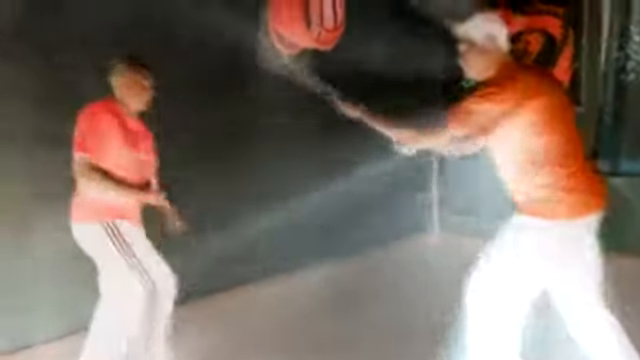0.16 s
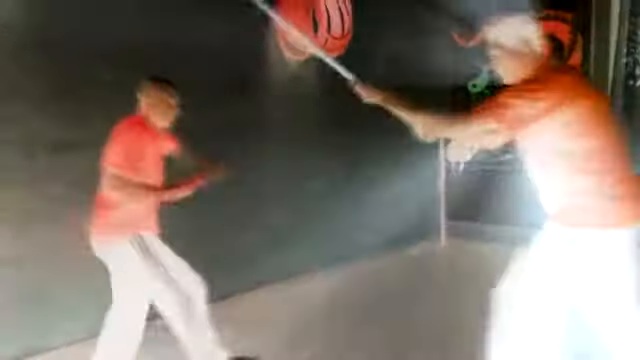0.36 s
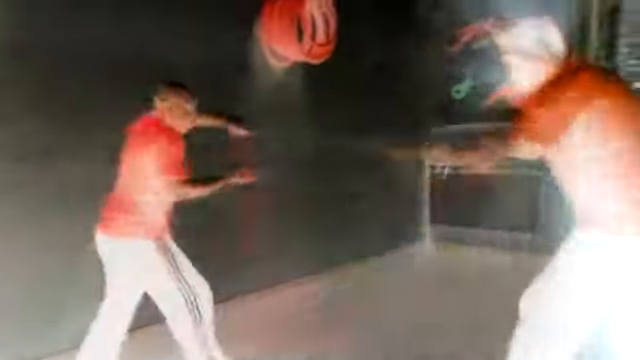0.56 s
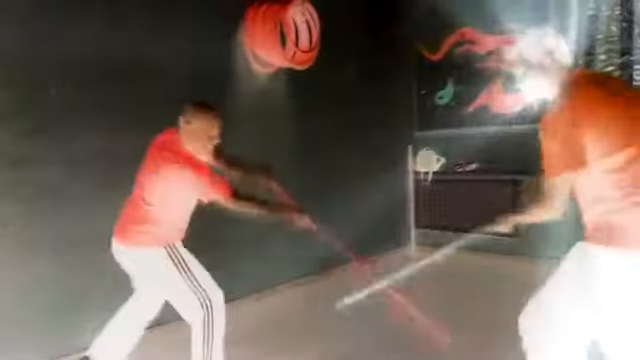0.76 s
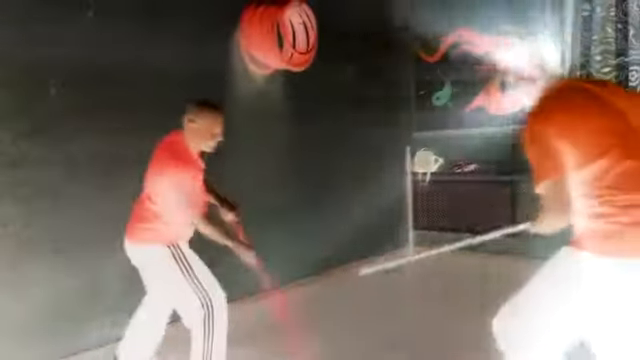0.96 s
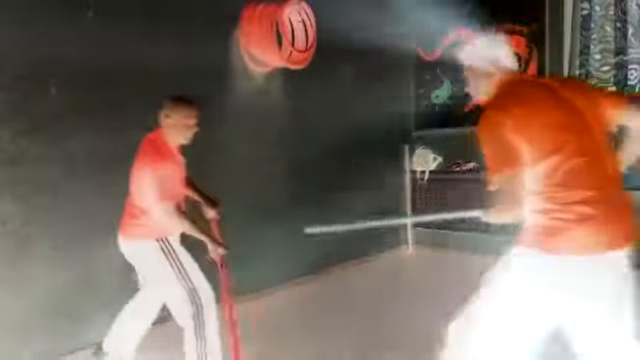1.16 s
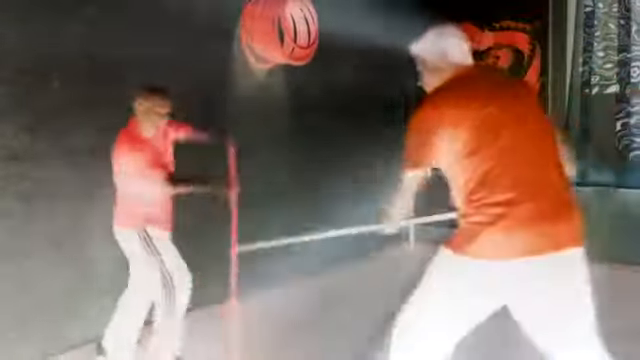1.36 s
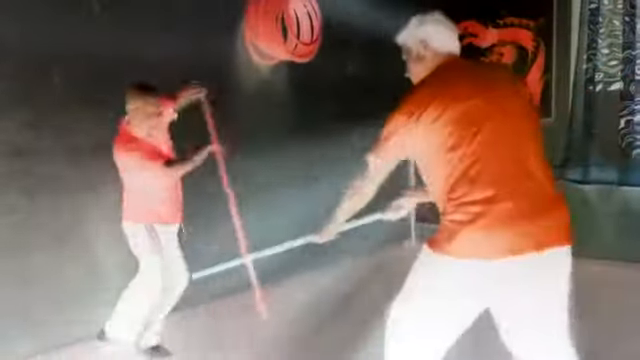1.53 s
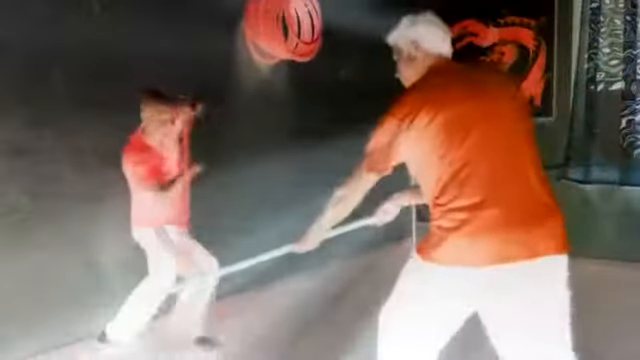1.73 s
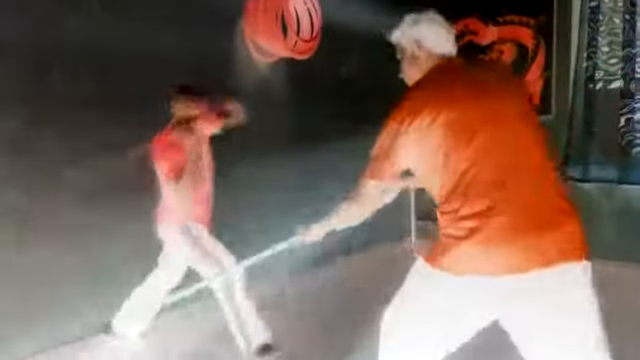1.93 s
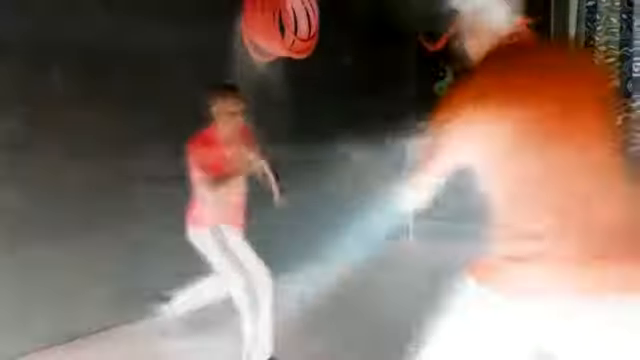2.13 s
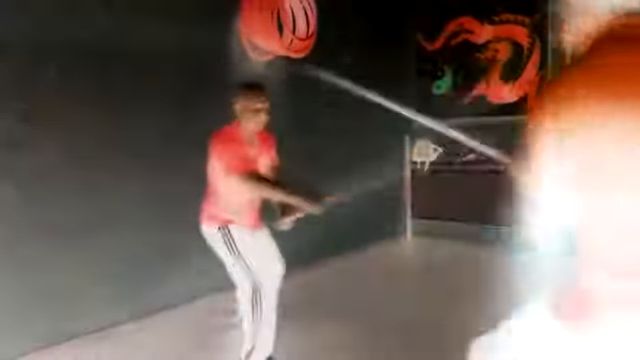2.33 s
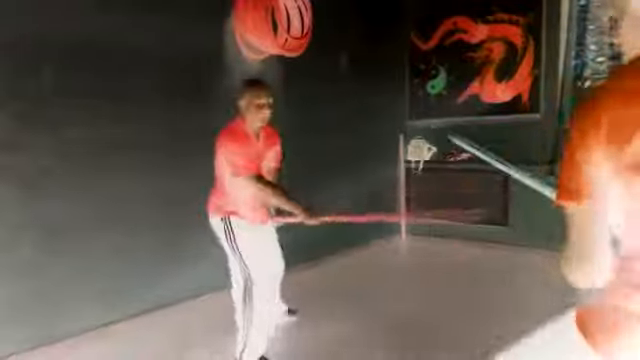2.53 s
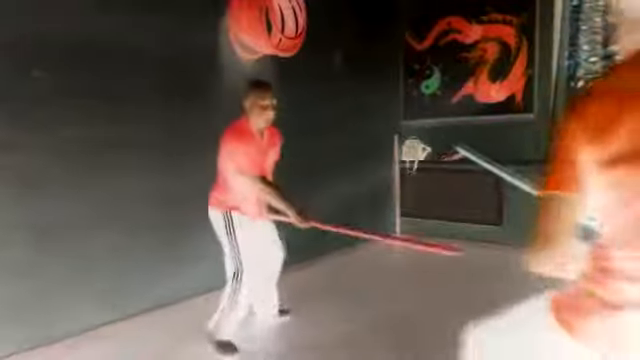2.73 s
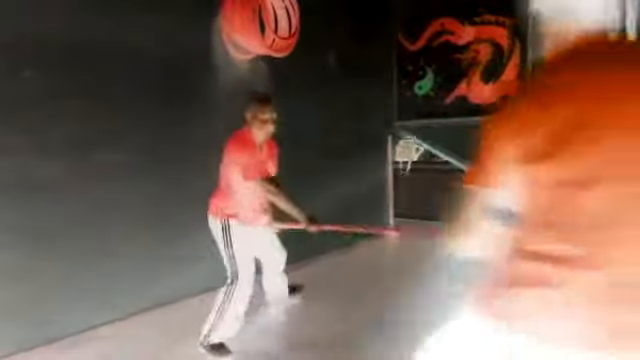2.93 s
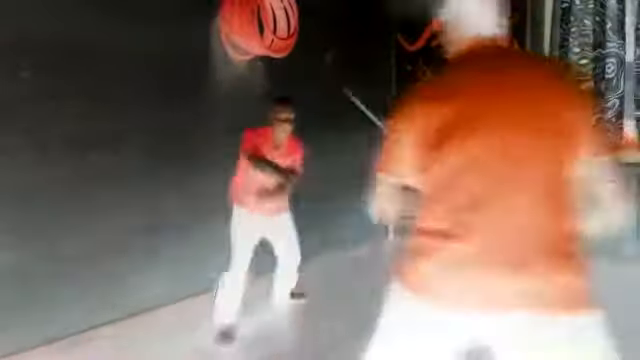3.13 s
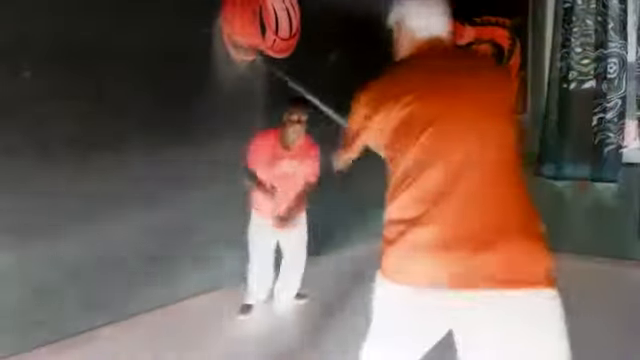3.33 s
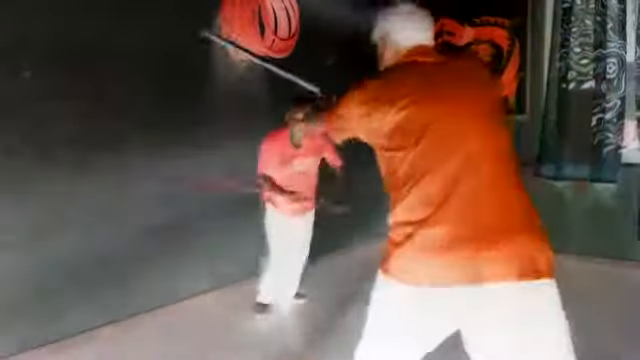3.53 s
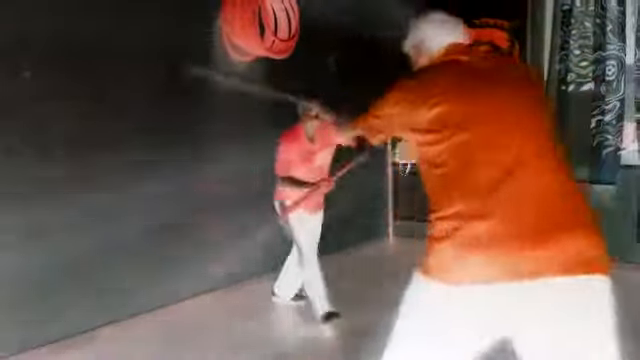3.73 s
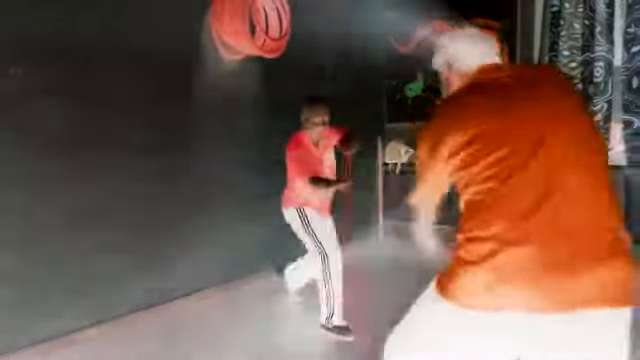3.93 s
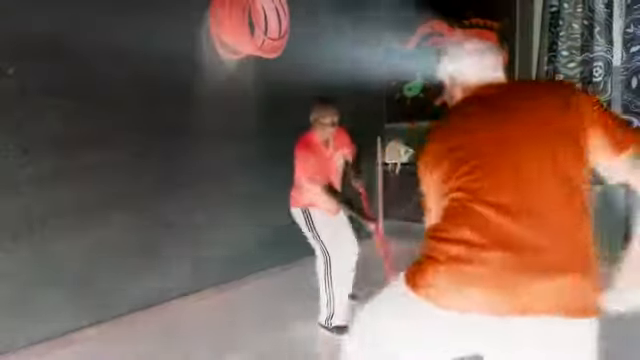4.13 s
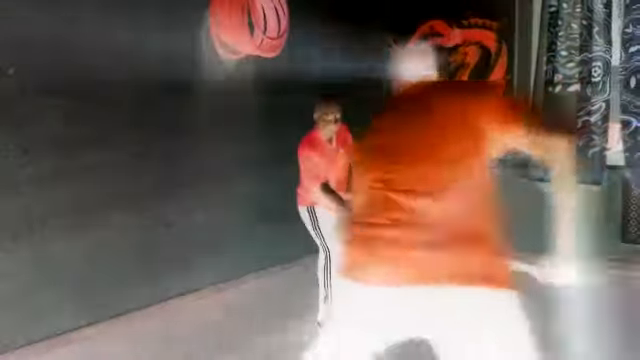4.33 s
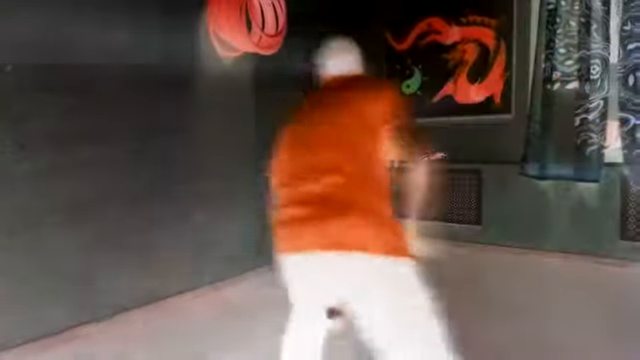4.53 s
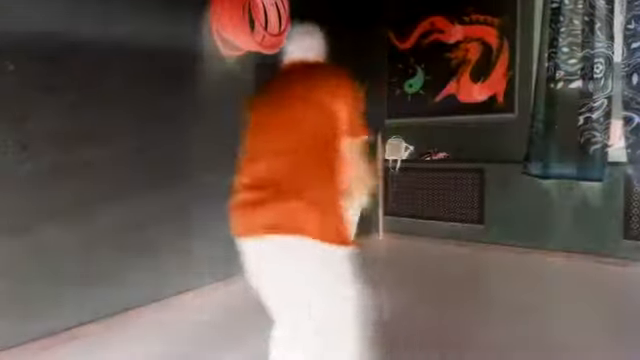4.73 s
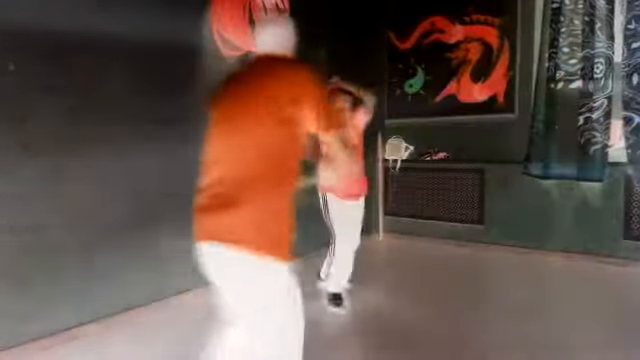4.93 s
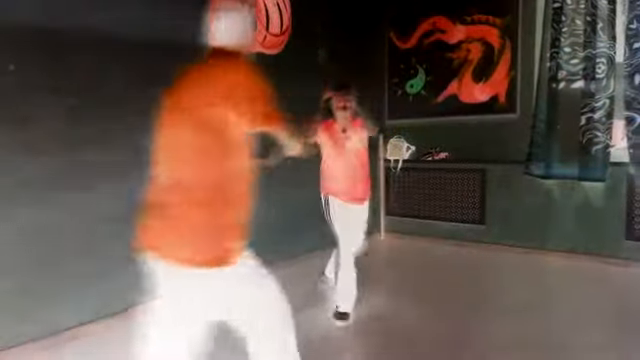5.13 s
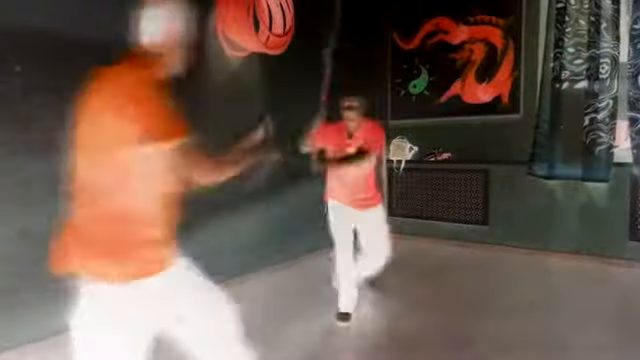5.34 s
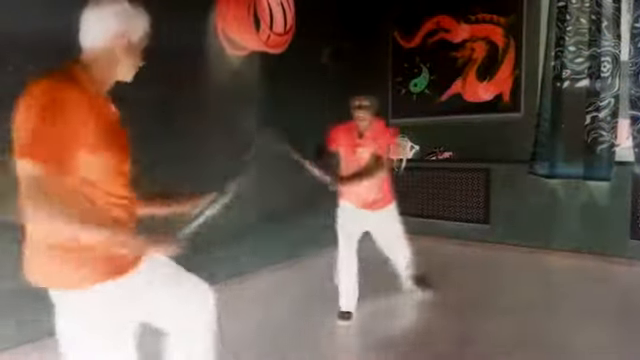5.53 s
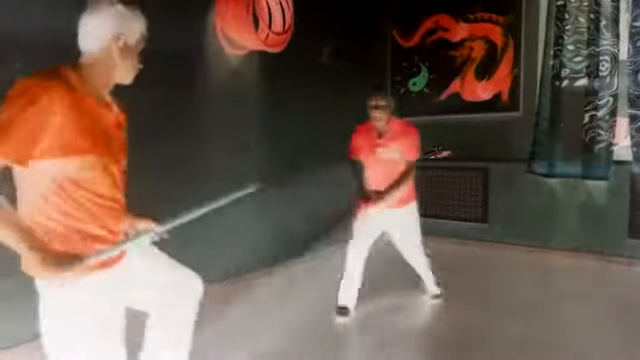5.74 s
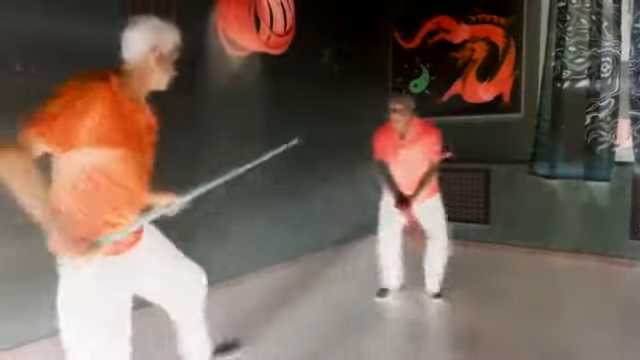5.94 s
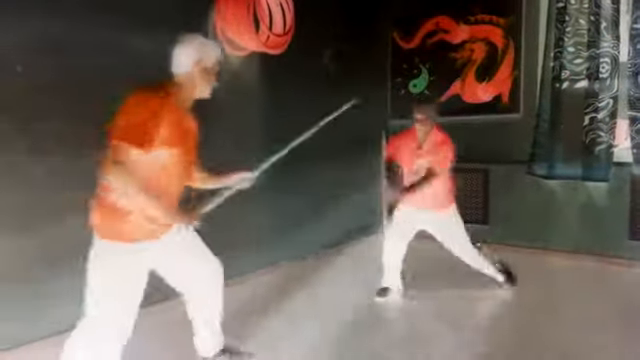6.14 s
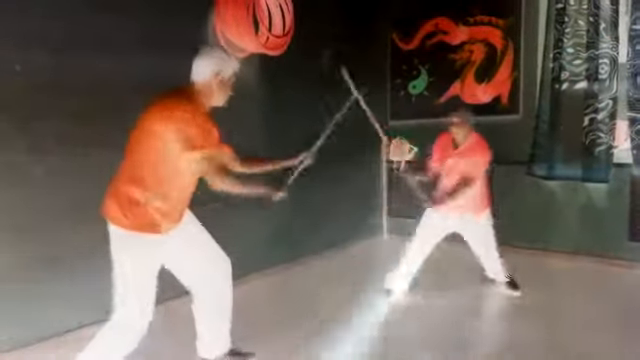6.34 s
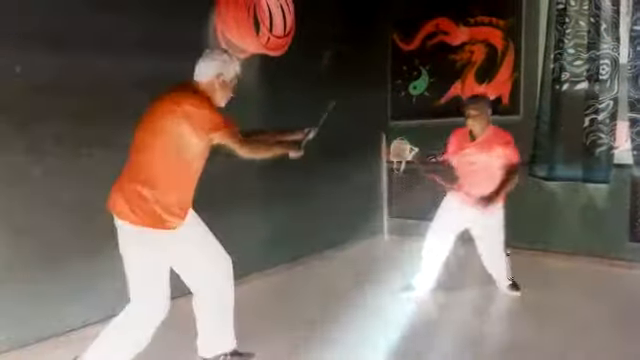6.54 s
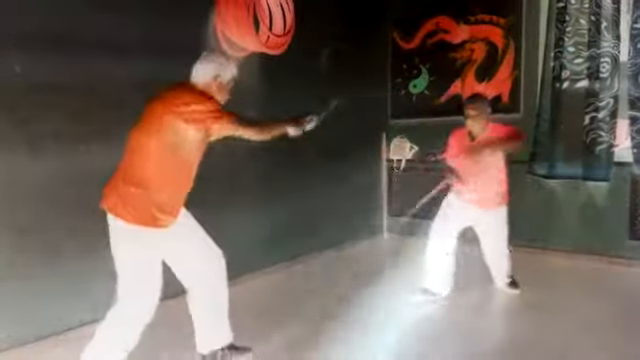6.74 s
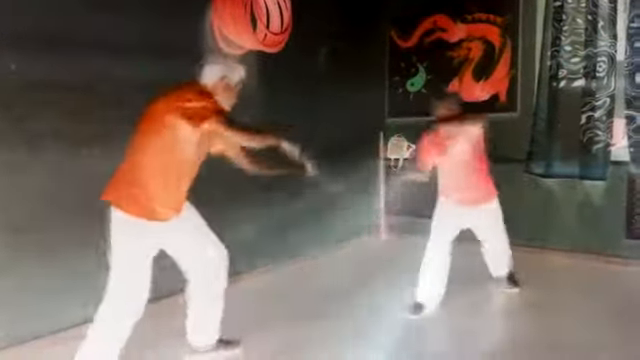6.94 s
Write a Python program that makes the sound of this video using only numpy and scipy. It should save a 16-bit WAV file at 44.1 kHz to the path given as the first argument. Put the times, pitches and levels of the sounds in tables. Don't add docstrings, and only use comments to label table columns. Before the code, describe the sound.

Two long wooden sticks crack sharply together in a reverberant bare hall while rubber soles squeak, scuff and thump on a smooth floor.

```python
import sys
import numpy as np
from scipy import signal
from scipy.fft import rfft, irfft, next_fast_len
from scipy.io import wavfile
from scipy.ndimage import uniform_filter1d

SR = 44100
rng = np.random.default_rng(int(sys.argv[2]) if len(sys.argv) > 2 else 0)


def volts_from_db(level):
    exponent = np.asarray(level, float) / 20
    return 10 ** exponent


def unload_wav(signal):
    wavfile.write(
        sys.argv[1],
        SR,
        np.round(np.clip(np.atleast_2d(signal).T, -1, 1) * 32767).astype(np.int16),
    )


N = 312669
LEAD = SR // 10
SPOTS = 4

# (time [s], direct peak [dB], ring [Hz], treble [dB], hall [dB])
CLACKS = [(-.05, -17.5, 1950, 6.5, 2.5), (0.7073, -15, 1867, 14, 3), (0.9343, -23, 2146, -4, -8),
          (2.1177, -38, 1610, -37, -4), (2.3312, -13, 1749, 6, -1.5), (3.2561, -13, 2354, 2, -3.5),
          (3.2659, -17, 2527, 5, 7), (4.0437, -12, 1741, 10.5, 4.5), (4.7513, -14.5, 2501, 3.5, 2),
          (4.772, -15.5, 2366, 6, -2.5), (5.497, -11, 1663, 8.5, 0), (6.3211, -8, 2418, 4, 0),
          (7.007, -50.5, 1896, 11.5, -0.5)]
# (frequency [Hz], level [dB])
STICK_COLOUR = [(59, -80.5), (100, -53), (211, -30), (281, -15.5), (568, -11), (643, -12), (713, -9.5),
                (1170, -10.5), (2050, -7), (3730, -21.5), (7220, -19), (9850, -31), (14000, -50.5)]
# (share of ring frequency [ratio], level [dB], t60 [s])
WOOD_MODES = [(0.681, -31, 0.033), (1.001, -14.5, 0.11), (1.18, -22.5, .04), (1.453, -22, 0.075),
              (3.3, -37.5, 0.036)]
# (time [s], level [dB])
JOLTS = [
    (0.705, -61.5),
    (2.331, -66),
    (4.044, -69.5),
    (5.496, -48.5),
    (6.321, -71.5),
]

# (frequency [Hz], t60 [s])
HALL_T60 = [(200, 0.6913), (600, 0.67828), (1400, 0.52159), (2500, 0.47694), (5000, 0.41308),
            (9000, 0.44588), (11000, 0.4), (14000, 0.5616)]
# (frequency [Hz], level [dB])
TAIL_SIDE = [(60, -23.5), (250, -25.5), (1500, -18), (4000, -19.5), (9000, -27)]

# (time [s], level [dB])
SCUFF_LEVEL = [(0, -55.5), (.25, -57), (.45, -90.5), (.7, -78.5), (1.25, -57), (1.65, -54.5), (1.95, -91),
               (2.5, -49.5), (2.95, -70), (3.15, -54), (3.6, -77.5), (4.68, -52), (5.3, -70), (5.45, -76),
               (6.05, -51), (6.2, -53.5), (6.7, -60.5), (7.1, -86.5)]
# (frequency [Hz], level [dB])
SHOE_COLOUR = [(60, -17.5), (160, -23), (290, -4.5), (1000, -4.5), (1800, -9), (2500, -14.5), (3000, -32.5),
               (6000, -35), (14000, -71.5)]

# (start [s], length [s], slip rate [Hz], level [dB], overtone [dB])
SNAPS = [(0.682, 0.02754, 1860, -56, -16), (1.553, .09, 2356, -45, -15.5), (1.707, 0.0089, 1935, -36, -43),
         (2.589, 0.02688, 2444, -34, -21), (2.8, .016, 1876, -34, -18.5), (2.819, 0.056, 2957, -43, -18),
         (3.203, 0.057, 2973, -43.5, -15), (3.781, 0.027, 2331, -37.5, -19),
         (4.678, 0.11, 2038, -40, -11.5), (5.323, 0.017, 1114, -45.5, -12.5),
         (5.886, 0.013, 2480, -41, -8.5), (5.97, 0.03593, 2584, -39.5, -16.5),
         (5.982, 0.077, 2095, -36.5, -19.5), (6.548, 0.034784, 2019, -29.5, -22.5),
         (7.004, 0.027, 1921, -54, -30), (7.055, 0.014, 1868, -48.5, -34.5)]
# (start [s], length [s], slip rate [Hz], level [dB], overtone [dB])
HOLDS = [(1.031, 0.011865, 2073, -34.5, -17), (1.536, 0.03, 2250, -44.5, -17),
         (2.576, .013, 2187, -29, -22), (2.832, 0.009229, 2478, -30, -9), (3.23, .024, 2455, -32.5, -9.5),
         (3.322, .036, 1686, -28, -3.5), (3.357, 0.04035, 1775, -24.5, -11.5),
         (3.395, 0.024747, 1935, -24.5, -13), (4.242, 0.04524, 1727, -35, -12),
         (5.887, 0.087, 2553, -57, -6.5), (6.032, 0.0167, 2496, -43, 7),
         (6.516, 0.032216, 2635, -29.5, -26), (6.6, 0.03852, 1907, -41, -16.5)]
# (start [s], length [s], slip rate [Hz], level [dB], overtone [dB])
SWELLS = [
    (2.714, .014, 2390, -33.5, -15.5),
    (3.18, 0.012724, 2316, -44, -16),
    (3.988, 0.040318, 1881, -12.5, -22),
    (4.018, 0.022, 2247, -27, -11),
    (4.235, .024, 2201, -14.5, -17.5),
]
# (start [s], length [s], first pitch [Hz], last pitch [Hz], level [dB])
SCRUBS = [
    (1.387, 0.14967, 1812, 1945, -49.5),
    (1.432, 0.2021, 878.8, 875.8, -55),
    (5.337, 0.1565, 1076, 946.7, -61),
    (6.501, .022, 2232, 2561, -35),
    (6.555, 0.023, 1996, 1906, -52.5),
    (6.64, 0.05, 1834, 1817, -57),
]
# (start [s], length [s], first pitch [Hz], last pitch [Hz], level [dB])
DRAGS = [
    (2.813, .02, 1863, 2258, -32),
    (2.851, 0.018, 2300, 2152, -43),
    (5.165, 0.052, 1600, 1568, -44.5),
    (6.012, .027, 1930, 1741, -38),
    (6.019, 0.037, 3110, 2958, -36),
]
# (start [s], length [s], first pitch [Hz], last pitch [Hz], level [dB])
PIVOTS = [
    (3.375, .065, 2479, 2597, -18.5),
    (4.648, .07, 2668, 2529, -28),
    (4.764, 0.11, 1950, 2212, -32),
    (6.031, 0.066, 2598, 2740, -31),
]

# (share of length before the top [0-1], start [dB], end [dB], roughness [0-1], hall [dB])
SNAP_COURSE = (0.5362, 0.5, -25.5, 0.1908, -4)
HOLD_COURSE = (-0.63, -1.8, -2.4, 0.14149, -2.6)
SWELL_COURSE = (.85, -17, -8, .045, -.8)
SCRUB_COURSE = (8.08, -4, -3.5, 0.5915, -6.0433)
DRAG_COURSE = (0.83, -2.1, -0.89, .28, -0.96)
PIVOT_COURSE = (0.3818, -16, -20, 0.1865, -4)
SNAP_BEND, SWELL_BEND, HOLD_BEND = 0.94949, 1.06, 0.91579
PIVOT_OVERTONE_DB, DRAG_OVERTONE_DB, SCRUB_OVERTONE_DB = -14, -13, -33.5
SETTLE = 3.0
RASP_DB = -20

# (time [s], peak [dB], sole [Hz], hall [dB], weight [dB])
STEPS = [(1.099, -30, 507.6, -5.5, 10.5), (1.226, -32.5, 804, -5, 8), (1.316, -35, 859, -1.5, 3.5),
         (1.736, -40, 339, -1, 3), (1.832, -50, 930, 7.5, -5), (1.894, -40.5, 1335, -4, -1.5),
         (2.05, -40.5, 1426, -2.5, 7), (2.12, -35, 1719, -3.5, 4.5), (2.202, -40.5, 940, -4.5, 15),
         (2.467, -46.5, 1130, 14.5, -9.5), (2.805, -38.5, 1120, -3.5, -11.5), (3.045, -46.5, 571.2, 4, 9),
         (3.437, -29, 1476, -7, 6), (3.759, -41, 760, 0.5, 2), (3.964, -37.5, 830, -2, -4),
         (4.204, -20, 800, -5, 6.5), (4.481, -30, 737, -6.5, 8.5), (5.192, -29, 1610, -1.5, -2),
         (5.766, -38.5, 789, -2.5, 4), (5.954, -39.5, 812.1, 4, -15), (6.264, -31, 754, -12.5, 8),
         (6.934, -61.5, 292, 2, 21.5), (7.013, -53, 320, -5, 13.5), (7.054, -45.5, 743, -1.5, 3.5)]

# (frequency [Hz], level [dB])
HISS_COLOUR = [(18, -37), (30, -18), (144, -30), (274, -0.5), (435, 1.5), (640, -10), (1100, -9.5),
               (2770, -18), (14000, -31)]
HISS_DB = -83.5
# (frequency [Hz], level [dB])
CAPSULE = [(50, -14.5), (150, -7), (1500, 1.0188), (2700, 3), (3100, -1.5), (4500, 4), (14000, -3.6056)]
# (threshold [dB], depth [dB], opening time [s], closing time [s])
GATES = [
    (-77, -22.5, 0.045, 0.024),
    (-76, -18, 0.068, 0.017),
]
# (frequency [Hz], level [dB])
TOP_FLOOR = [(8500, -125), (10200, -106), (11000, -97), (12500, -93), (14000, -90)]
SQUEEZE, SQUEEZE_FROM_DB, SQUEEZE_S = 0.08135, -38.5, 0.25
CEILING = 0.9224

BINS = np.fft.rfftfreq(4096, 1 / SR)


def evened(x):
    return x / np.sqrt(np.mean(x ** 2) + 1e-20)


def read(points, hz):
    f, value = np.transpose(points)
    return np.interp(np.log(hz + 1), np.log(f + 1), value)


def bump(hz, centre_hz, octaves):
    return np.exp(-.5 * (np.log2((hz + 1) / centre_hz) / octaves) ** 2)


def causal(db, size=2048):
    both_halves = np.r_[db, db[-2:0:-1]]
    log_gain = np.log(volts_from_db(np.maximum(both_halves, -100)))
    phase = -signal.hilbert(log_gain).imag
    pulse = np.fft.ifft(np.exp(log_gain + 1j * phase)).real[:size]
    return pulse / abs(pulse).max()


def coloured(points, size):
    spectrum = rfft(rng.standard_normal(size))
    gain = volts_from_db(read(points, np.fft.rfftfreq(size, 1 / SR)))
    return evened(irfft(spectrum * gain, size))


def add(mix, s, sound):
    part = mix[LEAD + round(s * SR):][:len(sound)]
    part += sound[:len(part)]


def clack(db, ring_hz, treble_db):
    treble_tilt = 2 * treble_db * (BINS / (BINS + 4000)) ** 2
    colour_db = read(STICK_COLOUR, BINS) + 8.0 * bump(BINS, ring_hz, 0.8) + treble_tilt
    touch = np.zeros(560)
    touch[0] = 1
    smear = np.exp(-np.arange(60) / 20.0)
    arrivals = rng.integers([93.0, 144.36, 302.99, 351.42], [109.46, 171.83, 303.38, 450.63])
    for at, bounce_db in zip(arrivals, [-1.5, -3.0, -7.0, -8.0]):
        touch[at:at + 60] += volts_from_db(bounce_db) * np.r_[1, .3 * rng.standard_normal(59)] * smear
    near_db = colour_db - 10.0 * bump(BINS, 3700, 0.11) + 3.8 * bump(BINS, 13000, 0.65)
    near = np.convolve(touch, causal(near_db))
    t = np.arange(len(near)) / SR
    for share, mode_db, t60 in WOOD_MODES:
        near += volts_from_db(mode_db - 60 * t / t60) * np.sin(2 * np.pi * share * ring_hz * t)
    return volts_from_db(db) * near, volts_from_db(db) * causal(colour_db)


def hall(sends):
    taps = np.zeros((2, SPOTS, SR))
    grid = np.arange(240, SR - 12, 12)
    at = grid + rng.integers(0, 12, (2, SPOTS, len(grid)))
    np.put_along_axis(taps, at, rng.choice([-1., 1.], at.shape), axis=2)
    taps *= np.minimum(1, 0.27302 + np.arange(SR) / SR / 0.029)
    hz, t, z = signal.stft(taps, SR, nperseg=256)
    t60 = np.maximum(read(HALL_T60, hz), .05)
    z = z * volts_from_db(-60 * t / t60[:, None])
    z[1] *= volts_from_db(read(TAIL_SIDE, hz))[:, None]
    tail = signal.istft(z, SR, nperseg=256)[1]
    tail /= np.linalg.norm(tail[0], axis=1)[:, None]
    return signal.fftconvolve(sends[None], tail, axes=2).sum(1)[:, :N + LEAD]


def scuff():
    s, db = np.transpose(SCUFF_LEVEL)
    size = N + LEAD
    stutter = evened(uniform_filter1d(rng.standard_normal(size), 700))
    rub = coloured(SHOE_COLOUR, size) + volts_from_db(-29) * coloured(STICK_COLOUR[-5:], size)
    level_db = np.interp(np.arange(-LEAD, N) / SR, s, db) + 0.65 * stutter
    return rub * volts_from_db(level_db)


def squeak(rows):
    s, *columns = np.transpose(rows)
    t = np.arange(s[0], s[-1], 1 / SR)
    hz, level_db, rough, overtone_db = (np.interp(t, s, c) for c in columns)
    wander = rng.standard_normal((12000, 2))
    for _ in range(2):
        wander = uniform_filter1d(wander, 40, 0)
    grip, press = wander[:len(t)].T * 8.531
    phase = 2 * np.pi * np.cumsum(hz * (1 + 0.21 * abs(rough) * grip)) / SR
    tone = np.sin(phase) + volts_from_db(overtone_db) * np.sin(2 * phase)
    tone += volts_from_db(overtone_db - 16.0 - 12.0 * rough) * np.sin(3 * phase)
    tone += volts_from_db(overtone_db - 34.0) * np.sin(4 * phase)
    to_end = np.minimum(t - s[0], s[-1] - t)
    edge = np.sin(np.pi / 2 * np.minimum(1, to_end / 0.0045646)) ** 2
    return np.sqrt(2) * volts_from_db(level_db + 5.8 * rough * press) * tone * edge


def gesture(course, s, length, first_hz, last_hz, db, overtone_db, settle=1):
    top, start_db, end_db, rough, hall_db = course
    share = np.linspace(0, 1, 17)
    top = np.clip(top, .01, .99)
    rise_db = start_db * np.clip(1 - share / top, 0, 1) ** 1.4
    fall_db = end_db * np.clip((share - top) / (1 - top), 0, 1) ** 0.95
    ease_db = rise_db + fall_db
    hz = last_hz + (first_hz - last_hz) * (1 - share) ** settle
    roughness = rough * (1 - .03 * ease_db)
    sound = squeak(np.c_[s + length * share, hz, db + ease_db, roughness, overtone_db + .1 * ease_db])
    grit = uniform_filter1d(np.diff(rng.standard_normal(12001))[:len(sound)], size=3)
    strength = uniform_filter1d(abs(sound), size=64)
    sound = sound + volts_from_db(RASP_DB) * np.sqrt(abs(rough)) * grit * strength
    return s, sound, sound, 1.0 + hall_db


def squeaks():
    steady = [(SNAP_COURSE, SNAP_BEND, SNAPS), (SWELL_COURSE, SWELL_BEND, SWELLS),
              (HOLD_COURSE, HOLD_BEND, HOLDS)]
    sliding = [(PIVOT_COURSE, PIVOT_OVERTONE_DB, PIVOTS), (DRAG_COURSE, DRAG_OVERTONE_DB, DRAGS),
               (SCRUB_COURSE, SCRUB_OVERTONE_DB, SCRUBS)]
    sounds = []
    for course, bend, rows in steady:
        for s, length, hz, db, overtone_db in rows:
            sounds.append(gesture(course, s, length, hz * bend, hz, db, overtone_db, SETTLE))
    for course, overtone_db, rows in sliding:
        for row in rows:
            sounds.append(gesture(course, *row, overtone_db))
    return sounds


def step(db, sole_hz, weight_db):
    size = 1200
    grains = rng.standard_normal(size) * (rng.random(size) < .03)
    patter = grains * np.exp(-np.arange(size) / SR / 0.016)
    patter[0] = 0.76
    sole_db = 6.0 * bump(BINS, sole_hz, 0.24)
    thud_db = weight_db * bump(BINS, 290, 0.66)
    slap = causal(read(SHOE_COLOUR, BINS) + sole_db + thud_db)
    near = np.convolve(patter, uniform_filter1d(slap, size=5))
    near *= volts_from_db(db) / abs(near).max()
    return near, slap * np.linalg.norm(near) / np.linalg.norm(slap)


def scene():
    direct = scuff()
    sends = np.zeros((SPOTS, N + LEAD))
    sounds = [(s, *clack(db, hz, treble), 8.8451 + wet) for s, db, hz, treble, wet in CLACKS]
    sounds += [(s, *step(db, hz, weight), 3.761 + wet) for s, db, hz, wet, weight in STEPS]
    sounds += squeaks()
    for k, (s, near, far, wet_db) in enumerate(sounds):
        add(direct, s, near)
        add(sends[k % SPOTS], s, volts_from_db(wet_db) * far)
    for s, db in JOLTS:
        add(direct, s, volts_from_db(db) * np.hanning(900))
    mid, side = hall(sends)
    return np.array([direct + mid + side, direct + mid - side])[:, LEAD:]


def level_of(x):
    power = uniform_filter1d((x ** 2).mean(0), size=512, origin=255)
    return 10 * np.log10(abs(power[::128]) + 1e-12)


def gate(x, threshold_db, depth_db, open_s, close_s):
    shut = 1 / (1 + volts_from_db(1.5728 * (level_of(x) - threshold_db)))
    state = shut.copy()
    for k in range(1, len(shut)):
        change = shut[k] - state[k - 1]
        time_s = close_s if change > 0 else open_s
        state[k] = state[k - 1] + change * min(1, 128 / SR / time_s)
    return volts_from_db(np.interp(np.arange(N) / 128, np.arange(len(state)), depth_db * state))


def squeeze(x):
    keep = np.exp(-1 / SR / SQUEEZE_S)
    start = [volts_from_db(2 * SQUEEZE_FROM_DB)]
    power = signal.lfilter([1 - keep], [1, -keep], (x ** 2).mean(0), zi=start)[0]
    return volts_from_db(-SQUEEZE * (10 * np.log10(power) - SQUEEZE_FROM_DB))


def thin_top(x):
    hz, t, z = signal.stft(x, SR, nperseg=1024)
    power = uniform_filter1d((abs(z) ** 2).mean(0), size=14, axis=0)
    band_db = 10 * np.log10(power + 1e-20)
    lack_db = (read(TOP_FLOOR, hz)[:, None] - band_db).clip(-40, 40)
    keep = 1 / (1 + volts_from_db(3.0 * lack_db))
    return signal.istft(z * np.where(hz[:, None] > 8000, keep, 1), SR, nperseg=1024)[1][:, :N]


def top_cut(x):
    return signal.sosfilt(signal.butter(12, 14220, fs=SR, output="sos"), x)


def record(dry):
    size = next_fast_len(N + LEAD)
    hz = np.fft.rfftfreq(size, 1 / SR)
    spectrum = rfft(dry, size) * volts_from_db(read(CAPSULE, hz))
    high = 1 / (1 + (3000 / (hz + 1)) ** 10) / (1 + (hz / 9500) ** 10)
    body = irfft(spectrum * (1 - high), size)[:, :N]
    treble = irfft(spectrum * high, size)[:, :N]
    x = body + volts_from_db(3.0) * treble * gate(treble, *GATES[1])
    x = x * gate(x, *GATES[0]) * squeeze(x)
    x = x + volts_from_db(HISS_DB) * coloured(HISS_COLOUR, N)
    rounded = CEILING * np.tanh(x / CEILING)
    return top_cut(thin_top(rounded))


dry = scene()
out = record(dry)
unload_wav(out)
```